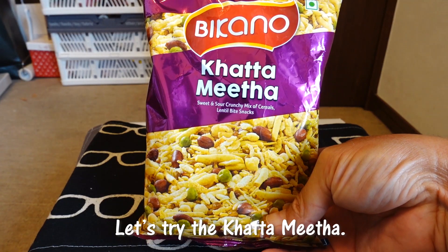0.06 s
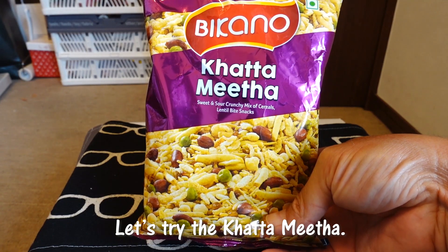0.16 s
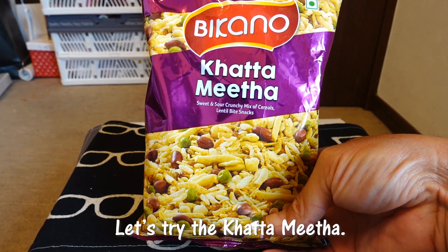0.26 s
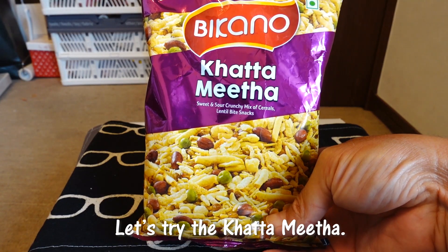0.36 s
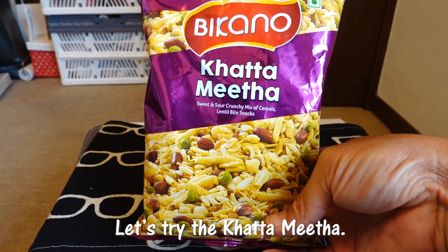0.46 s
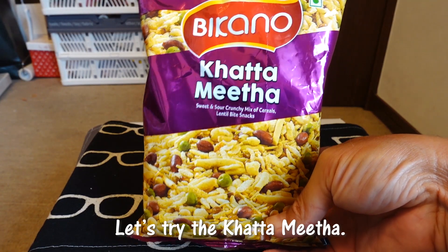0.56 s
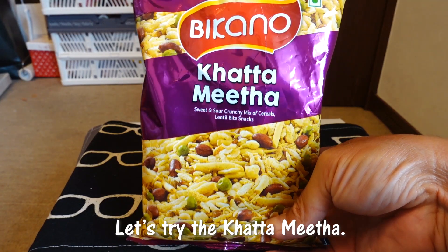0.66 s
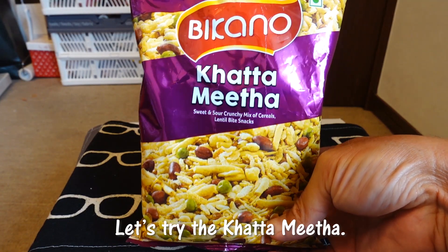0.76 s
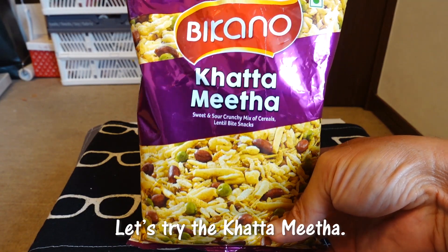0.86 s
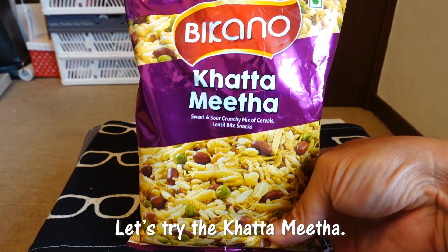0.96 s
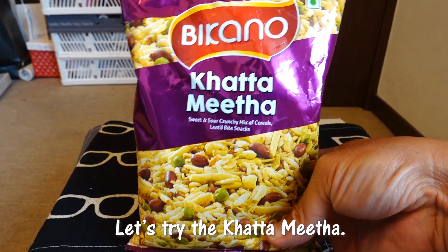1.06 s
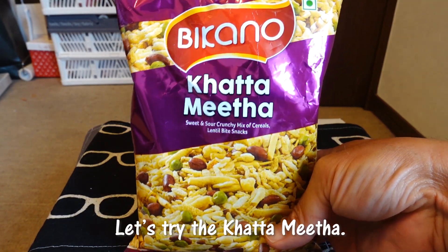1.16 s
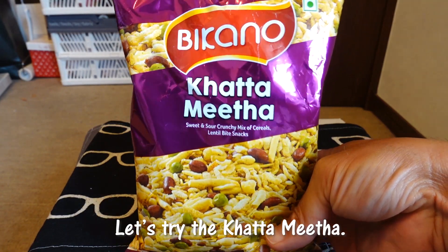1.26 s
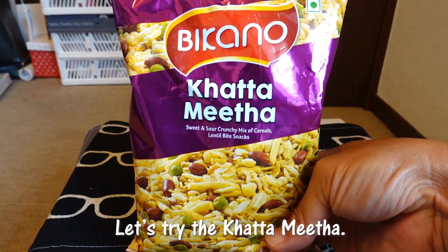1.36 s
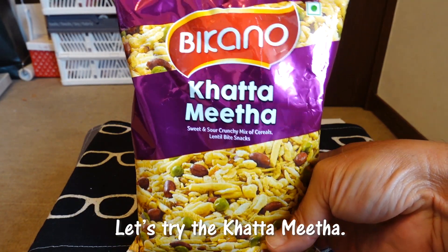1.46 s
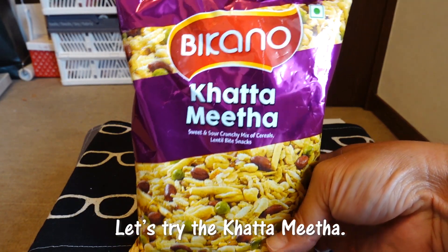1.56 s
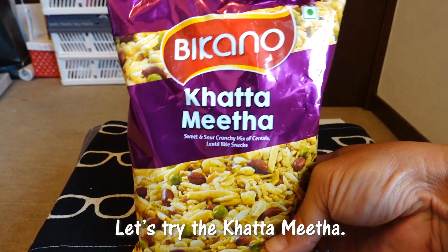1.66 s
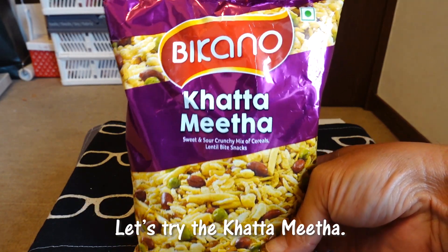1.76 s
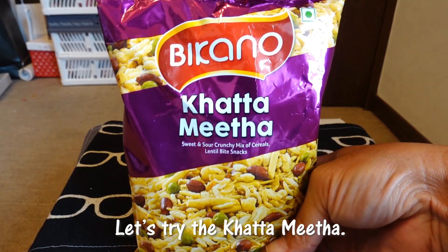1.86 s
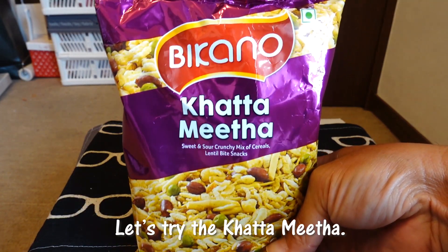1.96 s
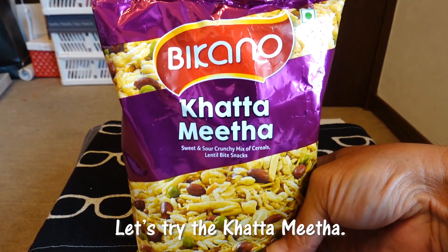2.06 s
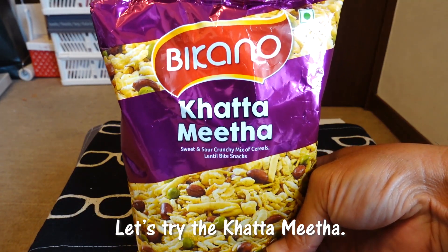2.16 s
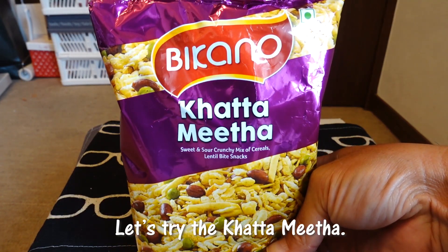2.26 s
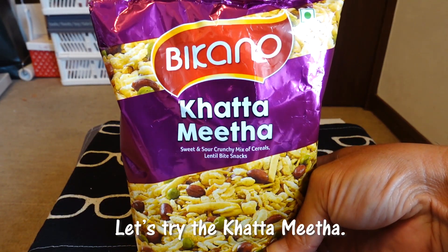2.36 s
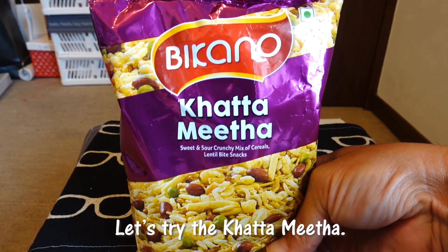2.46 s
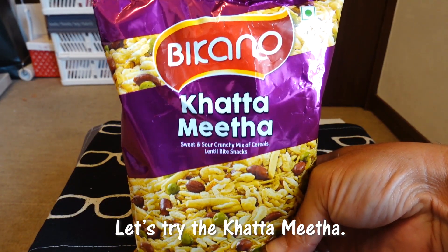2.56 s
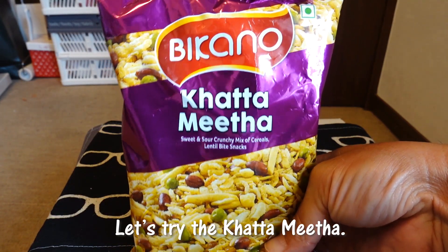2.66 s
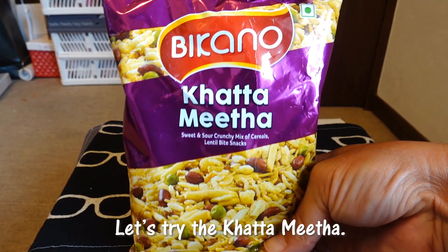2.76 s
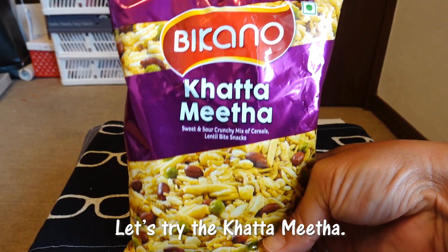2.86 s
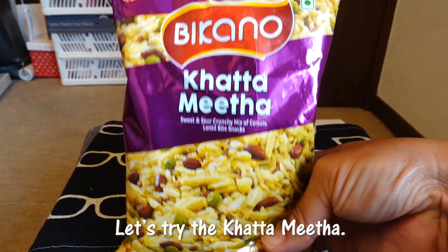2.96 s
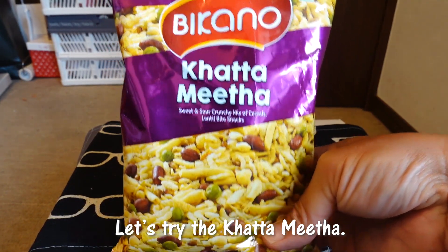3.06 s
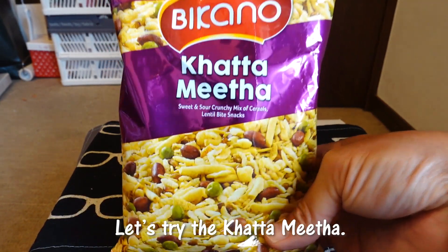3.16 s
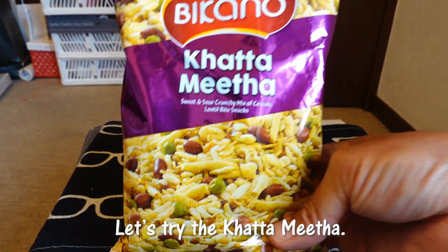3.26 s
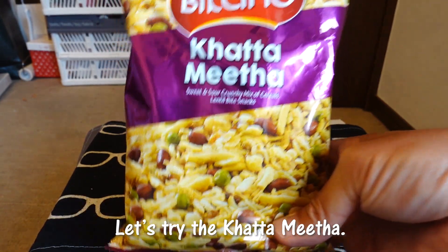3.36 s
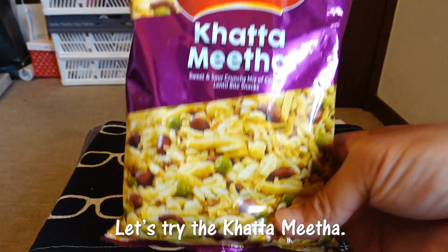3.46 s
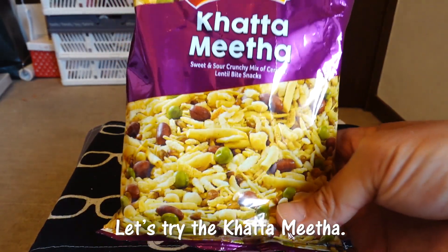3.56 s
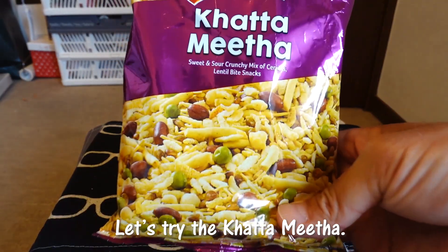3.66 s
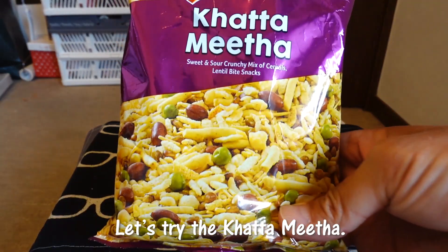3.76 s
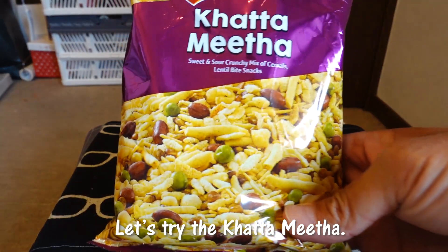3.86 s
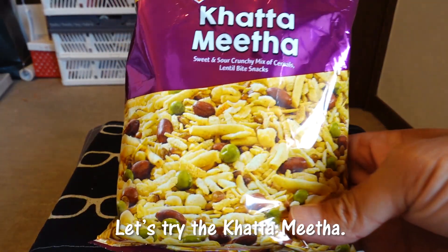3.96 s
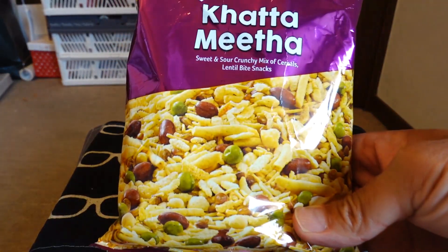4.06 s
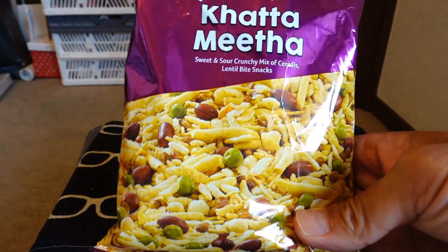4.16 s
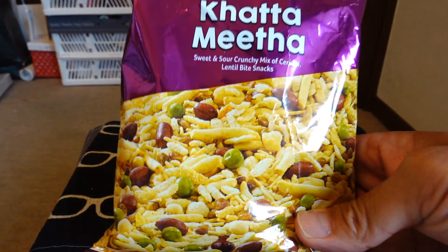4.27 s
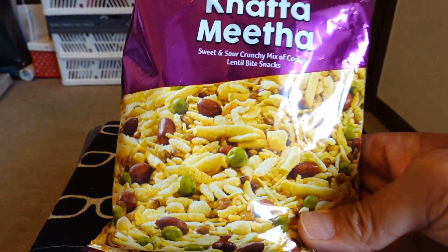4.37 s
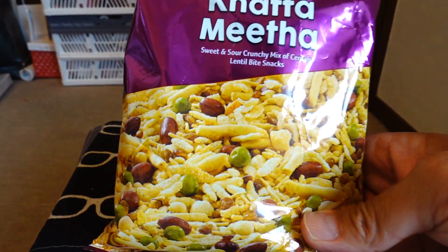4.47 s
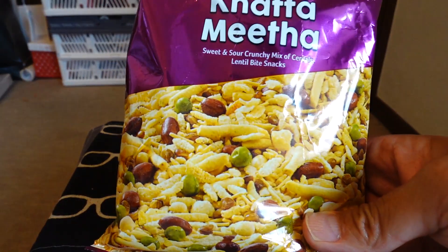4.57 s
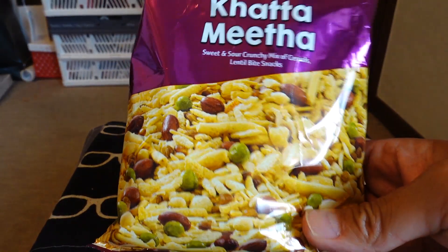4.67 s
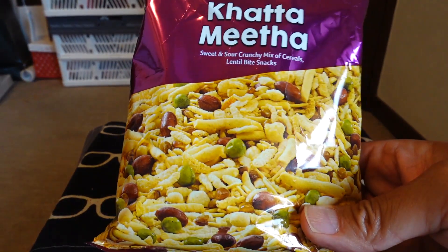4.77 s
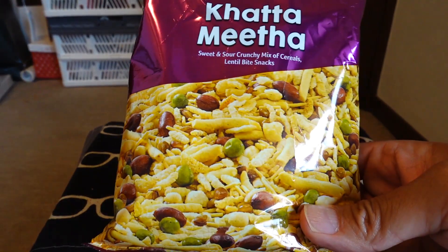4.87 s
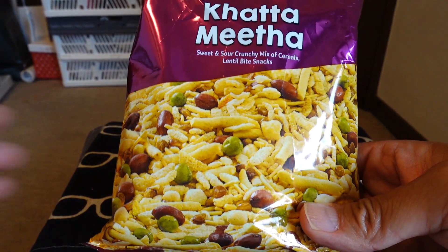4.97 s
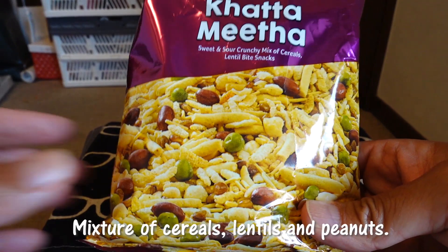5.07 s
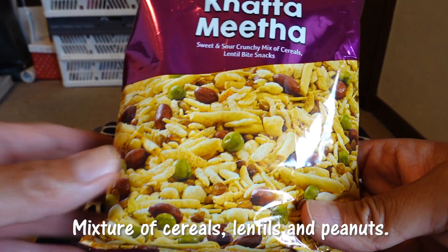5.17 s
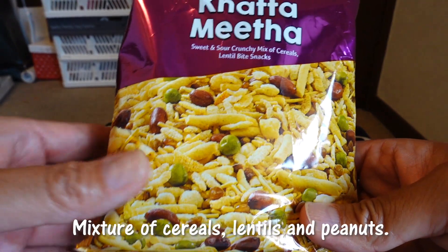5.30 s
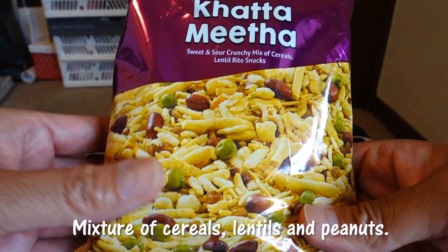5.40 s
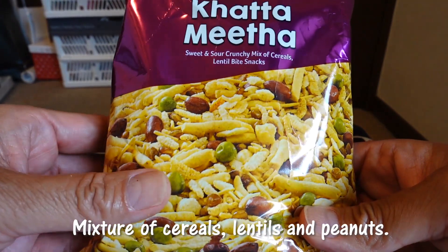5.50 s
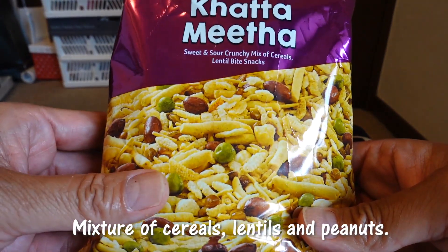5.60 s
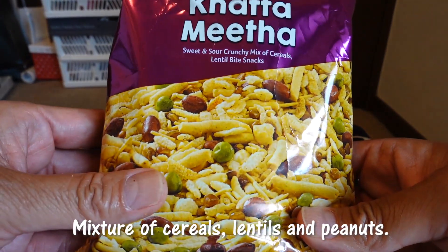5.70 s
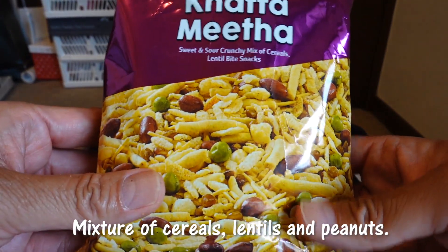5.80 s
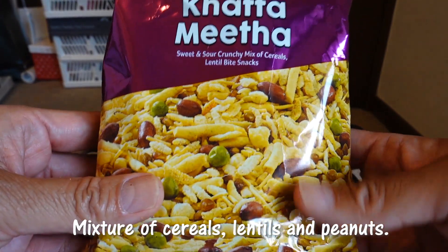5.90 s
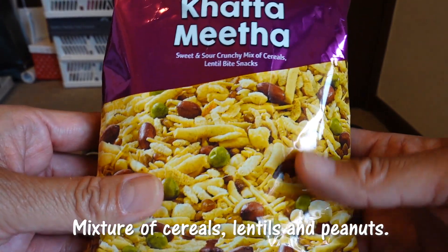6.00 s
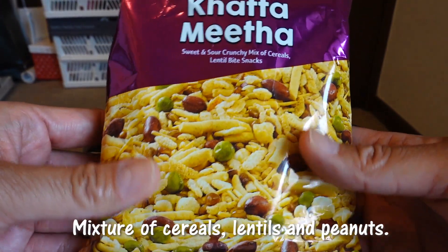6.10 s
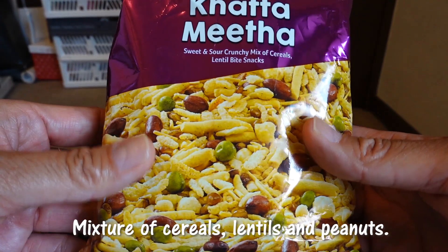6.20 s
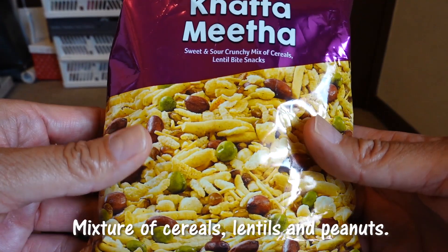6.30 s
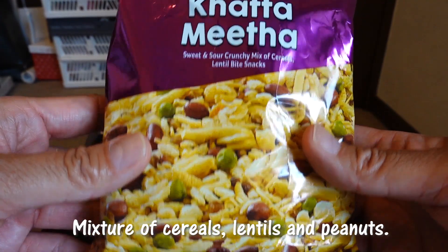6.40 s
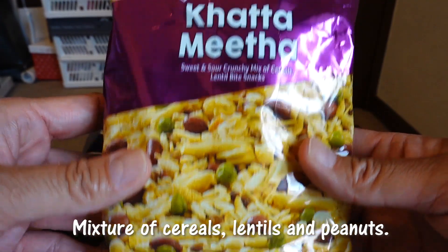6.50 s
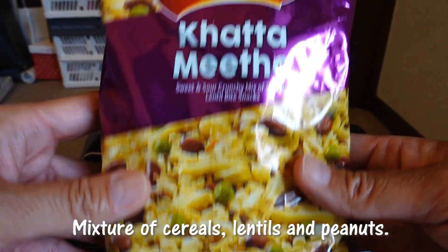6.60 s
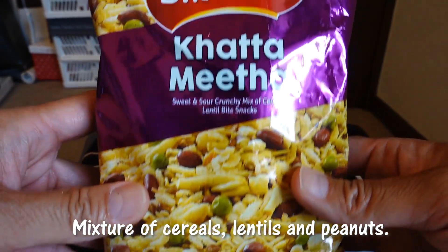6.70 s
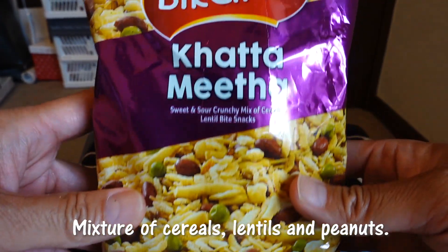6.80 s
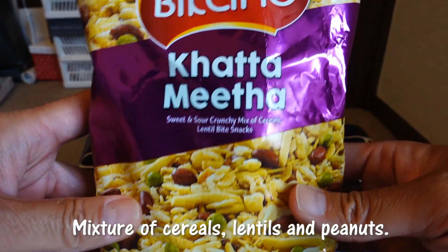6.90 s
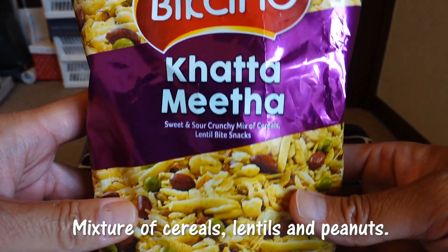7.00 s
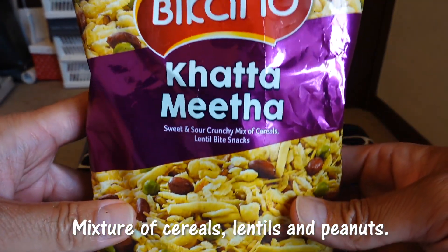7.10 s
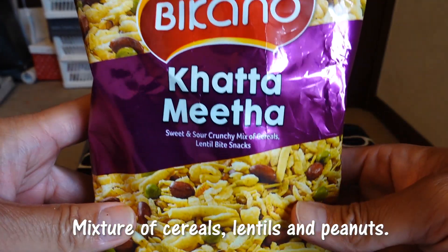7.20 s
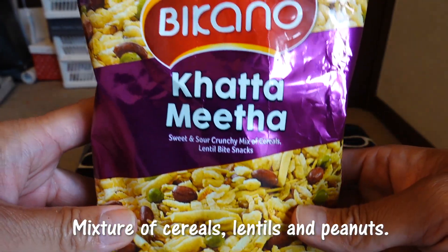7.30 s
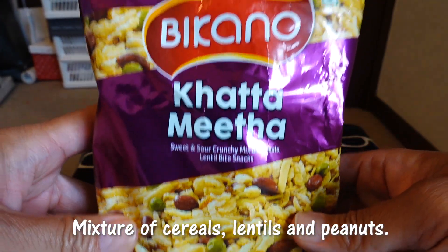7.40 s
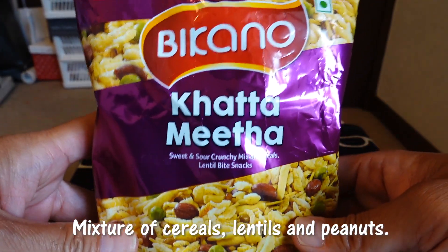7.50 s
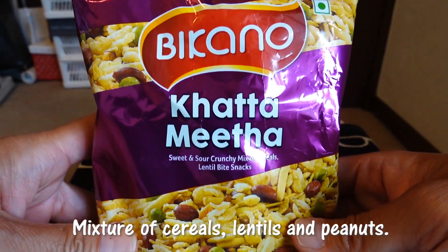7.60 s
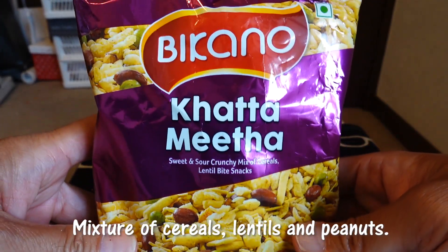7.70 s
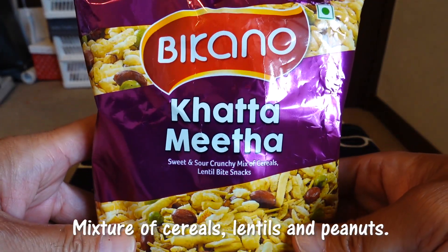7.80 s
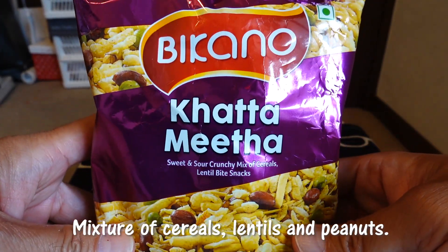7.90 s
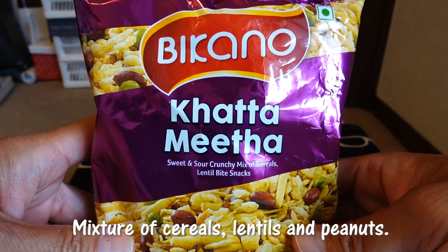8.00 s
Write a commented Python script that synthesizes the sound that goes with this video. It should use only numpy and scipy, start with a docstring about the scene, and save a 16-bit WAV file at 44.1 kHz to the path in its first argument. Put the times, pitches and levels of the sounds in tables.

```python
"""In a small, quiet room two hands hold and turn a foil snack packet close by.
In three spells of handling, creases in the stiff film snap at set times, from faint ticks to loud cracks:
each is a burst of band-filtered noise. Small folds give way at random as further bursts, and tiny
wrinkles make a rustle of random noise ticks. The walls answer with decaying noise; beneath lie soft air
noise, a steady whirr of three noise resonances, and a low hum whose pitch and level waver."""
import sys
import numpy as np
from scipy import signal
from scipy.fft import rfft, irfft, next_fast_len
from scipy.io import wavfile
from scipy.ndimage import map_coordinates

SR = 44100
rng = np.random.default_rng(int(sys.argv[2]) if len(sys.argv) > 2 else 0)


def int16_out(signal):
    """Quantize to a 16-bit WAV file."""
    q = np.round(np.clip(np.atleast_2d(signal).T, -1, 1) * 32767)
    wavfile.write(sys.argv[1], SR, q.astype(np.int16))


N = 355005

# how hard the fingers work the film, one curve for each spell of handling:
# (time [s], effort [dB, before the level of each layer])
HANDLING = [
    [(0.8, -75.5), (1.092, -61), (1.276, -61), (1.388, -50.5), (1.534, -53.5), (1.63, -48), (1.836, -59.5),
     (2.074, -66.5), (2.3, -91)],
    [(2.9, -75), (3.1, -70), (3.31, -54), (3.48, -53.5), (3.66, -65.5), (3.9, -55.5), (4.09, -56.5),
     (4.3, -61.5), (5.15, -64.5)],
    [(5.15, -64.5), (5.35, -53), (5.55, -47.5), (5.88, -50.5), (6.05, -49), (6.29, -46.5), (6.69, -48.5),
     (7.56, -62.5), (8.05, -71)],
]
# left-right correlation of the air and the whirr: (frequency [Hz], correlation [-1 to 1])
AIR_ALIKE = [(60, 1), (130, 0.32), (290, -0.011), (1400, -0.16), (6800, -0.21), (15000, 1)]


def amp(db):
    """Level law: decibels to an amplitude gain."""
    return 10 ** (np.asarray(db) / 20)


def unit(x):
    """Normalisation: scale to rms 1."""
    return x / np.sqrt(np.mean(x ** 2) + 1e-20)


def along(points, hz):
    """Logarithmic frequency scale: read (Hz, value) points between their knots."""
    f, v = np.transpose(points)
    return np.interp(np.log(hz + 1), np.log(f + 1), v)


def curve(rows):
    """Linear interpolation: (s, value) rows to one value per sample."""
    return np.interp(np.arange(N) / SR, *np.transpose(rows))


def wobble(rate):
    """Slow random modulation: a smooth curve through `rate` random knots a second."""
    knots = rng.standard_normal(int(N * rate / SR) + 4)
    return map_coordinates(knots, [np.arange(N) * rate / SR])


def filtered(x, response):
    """Linear filtering: the spectrum of x times a response of frequency, zero-padded."""
    n = x.shape[-1]
    m = next_fast_len(n + n // 2)
    spectrum = rfft(x, m) * response(np.fft.rfftfreq(m, 1 / SR))
    return irfft(spectrum, m)[..., :n]


def stereo_noise(gain, alike, size):
    """Interchannel correlation: the mid-side balance of coloured noise sets how alike the ears are."""
    def mid_side_gain(hz):
        turn = np.arccos(np.clip(along(alike, hz), -1, 1)) / 2
        return gain(hz) * np.array([np.cos(turn), np.sin(turn)])

    mid, side = filtered(rng.standard_normal((2, size)), mid_side_gain)
    return unit(np.array([mid + side, mid - side]))


def add(track, sound, s):
    """Superposition: mix a sound into a track at time s."""
    start = max(0, round(s * SR))
    part = track[:, start:start + sound.shape[-1]]
    part += sound[..., :part.shape[-1]]


def room_air(level_db=-65):
    """Broadband noise: random pressure shaped by a fixed spectrum."""
    # spectrum of the air: (frequency [Hz], relative density [dB per Hz])
    air_spectrum = [(20, -23), (38, -25), (52, -8.5), (130, -0.5), (320, 0.5), (520, -1.5), (850, -1),
                    (1080, -12), (1450, -2), (2200, -4.5), (3500, -11.5), (7000, -17.5), (15500, -23.5)]
    return amp(level_db) * stereo_noise(lambda hz: amp(along(air_spectrum, hz)), AIR_ALIKE, size=N)


def whirr(level_db=-68):
    """Resonance: steady noise selected by three damped modes."""
    # (centre [Hz], half-width at half amplitude [Hz], relative level [dB], left over right [dB])
    modes = [(622, 62, 2.5, -6), (1184, 110, 6.5, 9), (1710, 54, -6.5, -6.5)]
    total = np.zeros((2, N))
    for centre_hz, width_hz, db, lean_db in modes:
        noise = stereo_noise(lambda hz: 1 / (1 + ((hz - centre_hz) / width_hz) ** 2), AIR_ALIKE, size=N)
        total += amp(db) * unit(amp([[lean_db / 2], [-lean_db / 2]]) * noise)
    return amp(level_db) * total


def low_hum(pitch_hz=100.6, waver_hz=4.0, waver_db=2.5, level_db=-1.0):
    """Frequency and amplitude modulation: a sine with random waver of pitch and level."""
    # swells of the hum: (time [s], level [dB, before level_db])
    swells = [(0.0, -75), (0.27, -69.5), (0.65, -89), (1.59, -77), (1.64, -87), (1.99, -69.5), (2.08, -80),
              (2.85, -81), (3.03, -91), (3.27, -64), (3.72, -85), (3.76, -76.5), (5.56, -69.5), (5.69, -88),
              (5.87, -70.5), (6.84, -83.5), (7.73, -75), (8.05, -85)]
    phase = 2 * np.pi * np.cumsum(pitch_hz + waver_hz * wobble(22)) / SR
    tone = unit(amp(waver_db * wobble(11)) * np.sin(phase))
    return amp(curve(swells) + level_db) * tone


def background():
    """Superposition of independent sources: air, whirr and hum."""
    return room_air() + whirr() + low_hum()


def room_tail(arrival_s=0.0205, early_db=-6):
    """Reverberation: weak scatter from things nearby, then the walls' answer, decaying band by band."""
    # reverberation time: (frequency [Hz], time to fall 60 dB [s])
    decay_times = [(150, 0.29), (600, 0.4), (2500, 0.31), (6000, 0.31), (14000, 0.38)]
    # spectrum returned by the room: (frequency [Hz], relative level [dB])
    returned = [(150, 0.5), (600, -2), (3000, 1.5), (7000, 3.5), (14000, -0.5)]
    # left-right correlation of the tail: (frequency [Hz], correlation [-1 to 1])
    tail_alike = [(60, .9), (290, 0.17), (640, 0.8), (3100, 0.74), (15000, 0.57)]
    noise = stereo_noise(lambda hz: amp(along(returned, hz)), tail_alike, size=SR // 3)
    hz, t, z = signal.stft(noise, SR, nperseg=256)
    decay = amp(-60 * t / along(decay_times, hz)[:, None])
    tail = signal.istft(z * decay, SR, nperseg=256)[1]
    t = np.arange(tail.shape[1]) / SR
    scatter = amp(early_db * np.clip((arrival_s - t) / 0.0017, 0, 1))
    onset = np.clip(t / 0.0019, 0, 1)
    tail = tail * scatter * onset
    return tail / np.linalg.norm(tail[0])


def effort_db():
    """Excitation strength: how hard the fingers work, up to 30 dB weaker before the first spell."""
    rows = np.concatenate(HANDLING)
    return curve(rows) - 30 * np.clip(1 - np.arange(N) / SR / rows[0][0], 0, 1)


def rustle(level_db=-4, rate=260, spread_db=3.5, slide_db=-11, grain_s=0.0009, room_db=-4):
    """Shot noise: about `rate` wrinkle ticks a second at random times, over the hiss of sliding fingers."""
    # spectrum of the film: (frequency [Hz], relative density [dB per Hz])
    film_spectrum = [(60, -46), (300, 4), (700, 13), (1500, 12.5), (3200, 7), (6000, 0), (10000, -12),
                     (16000, -24)]
    # a light touch stirs only the film, a firm grip the whole bag:
    # below bag_hz each dB of effort adds a further bag_grows dB, none at firm_grip_db
    bag_hz, bag_grows, firm_grip_db = 1780, 0.22, -48
    sizes = (rng.random(N) < rate / SR) * amp(spread_db * np.minimum(rng.exponential(size=N), 3))
    life = np.exp(-np.arange(SR // 100) / SR / grain_s)
    ticks = unit(signal.fftconvolve(sizes, life)[:N] * rng.standard_normal(N))
    slide = amp(slide_db) * rng.standard_normal(N)
    film = unit(filtered(ticks + slide, lambda hz: amp(along(film_spectrum, hz))))
    effort = effort_db()
    body = filtered(film, lambda hz: 1 / (1 + (hz / bag_hz) ** 4))
    body_growth = amp(bag_grows * (effort - firm_grip_db)) - 1
    film = (film + body * body_growth) * amp(effort + level_db)
    reverberant = signal.fftconvolve(film[None], room_tail(), axes=1)[:, :N]
    return film + amp(room_db) * reverberant


def fold_db(hz, pitch_hz, body_db, crisp_db, ring_db, overtone_db, ring_octaves,
            fade_db=7, top_db=-30, film_db=3, bass_db=-35):
    """Plate resonance: half-octave levels shaped at a fold's pitch, its octave and the film's 5.2 kHz."""
    shape = [(40, body_db - 82), (100, body_db + bass_db), (350, body_db), (pitch_hz, 0),
             (8000, crisp_db), (11300, crisp_db - fade_db), (16000, crisp_db + top_db)]
    bump = lambda centre_hz, octaves: np.exp(-(np.log2((hz + 1) / centre_hz) / octaves) ** 2)
    peaks = ring_db * bump(pitch_hz, ring_octaves) + overtone_db * bump(2 * pitch_hz, ring_octaves)
    return along(shape, hz) + peaks + film_db * bump(5220, 0.27)


def snap(pitch_hz, life_ms, colour, shiver_db=-25, shiver_s=0.033, dispersion=0.46):
    """Buckling and dispersion: a crease flips in half-octave bursts, low ones slower, then the bag shivers."""
    # short waves reach left and right less alike: (frequency [Hz], side-to-mid level [dB])
    width = [(200, -33), (1000, -19), (3000, -17.5), (7000, -14.5), (13000, 6.5)]
    # one band lies on the fold's pitch
    lowest_hz = pitch_hz / 2 ** (np.round(2 * np.log2(pitch_hz / 125)) / 2)
    centres = lowest_hz * 2 ** (np.arange(15) / 2)[:, None, None]
    t = np.arange(1200) / SR
    mid, side = rng.standard_normal((2, len(t)))
    side = side * amp(along(width, centres))
    band = lambda hz: np.exp(-(2 * np.log2((hz + 1) / centres)) ** 2)
    noise = filtered(np.concatenate([mid + side, mid - side], axis=1), band)
    # time in units of each band's rise time; life_ms holds at 2500 Hz
    u = t / (max(life_ms, .15) / 1000 * (centres / 2500) ** -dispersion)
    flip = u * np.exp(1 - u)
    shiver = amp(shiver_db) * (1 - np.exp(-u)) * np.exp(-t / (shiver_s * (centres / 2000) ** -.5))
    # a small panel radiates little far below or above its band
    radiation = lambda hz: (1j * hz / (1j * hz + centres / 4)) ** 3 / (1 + (hz / centres / 1.4) ** 6)
    burst = filtered(noise * (flip + shiver), radiation)
    # each band to rms 1 over 10 ms
    burst /= np.sqrt(np.sum(burst ** 2, axis=(1, 2), keepdims=True) / (2 * .01 * SR))
    return np.sum(burst * colour(centres), axis=0)


def creases(rows, room_db=-1.5, count=16):
    """Direct and reverberant field: each snap adds its own, broader colour through one of `count` tails."""
    ring_octaves, wall_ring_octaves = .2, .36  # width of a fold's ring, nearby and at the walls
    # above hard_snap_db the octave gains overtone_grows dB per dB of snap level
    base_overtone_db, hard_snap_db, overtone_grows = -1.5, -36.5, 0.67
    track = np.zeros((2, N))
    tails = [room_tail() for _ in range(count)]
    # half-octave level over 10 ms to gain per Hz
    per_hz = lambda hz: SR * np.sqrt(.01 / (np.log(2) * (hz + 1)))
    for k, (s, db, pitch_hz, body_db, crisp_db, life_ms, wall_db, ring_db) in enumerate(rows):
        overtone_db = base_overtone_db + overtone_grows * max(db - hard_snap_db, 0)
        colour = lambda hz, octaves: amp(
            fold_db(hz, pitch_hz, body_db, crisp_db, ring_db, overtone_db, octaves))
        near = lambda hz: colour(hz, ring_octaves)
        far = lambda hz: colour(hz, wall_ring_octaves) * per_hz(hz)
        add(track, amp(db) * snap(pitch_hz, life_ms, near), s)
        add(track, amp(db + wall_db + room_db) * filtered(tails[k % count], far), s)
    return track


def small_folds(count=150):
    """Random point process: folds give way as strongly as the fingers press; rows as for timed creases."""
    folds_per_s, over_effort_db, spread_db = 15, -5, 2
    middle_hz, spread_octaves, middle_life_ms = 2480, 0.59, 0.68
    body_db, crisp_db, wall_db, ring_db = -21.5, -13.5, -1, 4.5
    effort = effort_db()
    draws = rng.standard_normal((count, 3)).clip(-2, 2)
    first_s = HANDLING[0][0][0]
    times = np.cumsum(rng.uniform(.2, 1.8, count)) / folds_per_s + first_s
    rows = []
    for s, (size, pitch, life) in zip(times, draws):
        if s * SR < N:
            level_db = effort[int(s * SR)] + over_effort_db + spread_db * size
            pitch_hz = middle_hz * 2 ** (spread_octaves * pitch)
            life_ms = middle_life_ms * 2 ** (life / 2)
            rows.append((s, level_db, pitch_hz, body_db, crisp_db, life_ms, wall_db, ring_db))
    return rows


def timed_creases():
    """Snap-through instability: creases that snap at set times, from faint ticks to loud cracks."""
    # (time [s], level [dB], pitch of the fold [Hz], body at 350 Hz [dB], crispness at 8 kHz [dB],
    #  life at 2500 Hz [ms], share thrown at the walls [dB, before room_db], ring at its pitch [dB])
    snaps = [(1.0789, -47.5, 5300, -22.5, -12.5, 1.3, 2, -1.5), (1.1926, -55.5, 2420, -34, -15, 1.4, 0, -4),
             (1.344, -51.5, 770, -30, -26, 1.1, -19, 4), (1.3806, -51.5, 2260, -34, 9, 0.34, -2.5, 19),
             (1.4123, -62.5, 766, -21, 6, 0.87, -13, 16), (1.49, -61, 2730, -30, -29, 1, 7, 9),
             (1.527, -50.5, 2180, -12, -13, 2.2, -4, 9.5), (1.5442, -56, 1220, 1, -11, 2.8, -1, 10.5),
             (1.6458, -61, 1360, -37, -3, 0.8, -1, 18), (1.711, -54, 1570, -2, -20, 2.2, 4.5, 9.5),
             (1.772, -49.5, 1760, -15, -10, 2.8, -5.5, 1), (2.3814, -38.5, 2400, -20, -24, 1.4, -10, -17),
             (2.3888, -39, 3460, -5.5, -6, 2.3, -3.5, 5), (3.029, -70.5, 3000, -17, -5.5, 1.2, 11.5, -4),
             (3.3426, -53.5, 1120, -56, 1, 0.83, -6, 5.5), (3.4555, -54.5, 1860, -21, -10, 1.3, 9.5, 2),
             (3.4848, -44.5, 1560, -28, -16, 0.33, -11, -7), (3.4959, -38, 1260, -29, -4, 0.84, -8, -5.5),
             (3.5599, -48.5, 1700, -14.5, -20, 0.99, -7, -7), (3.5995, -47, 1770, -32, -20, 0.55, 5.5, -5),
             (3.9312, -46.5, 1130, -24, -12.5, 3, 3, -0.5),
             (3.9793, -40.5, 3200, -27.5, -10, 0.49, -9, 1.5), (4.0904, -56, 2800, -40, 11, 0.42, -15, 13),
             (4.0944, -51.5, 2900, -39, 2.5, 0.43, -7, 14), (4.1026, -58.5, 3700, -15, -3, 0.36, -10, 16.5),
             (4.2073, -62, 3080, -31, -8, 0.65, -2, 9.5), (4.2598, -59, 1690, -41, -4.5, .47, 3, 5.5),
             (4.2711, -59.5, 3000, -24, -4.5, .9, -0.5, 7.5), (4.2908, -58.5, 3130, -29, -20, 0.27, -9, 6),
             (4.4377, -61.5, 3230, -26, 2, .3, -0.5, 9), (4.4548, -71, 3110, -25, 1, .4, -11, -3),
             (4.641, -56, 824, -16, -15, 2.6, 7, 3.5), (4.7287, -43, 2620, -26.5, -4, 0.49, 1.5, 11.5),
             (4.7919, -42, 1090, -41, -39, 0.68, -6, 2.5), (5.0036, -61.5, 2930, -5.5, -45, 0.66, -4, 7.5),
             (5.437, -36.5, 3630, -19, -14, 0.77, 0, 1), (5.5371, -40.5, 2460, -23, -5, 0.46, -8, 3.5),
             (5.5993, -42.5, 3470, -27, -5, 0.48, -2, -3), (5.6459, -44, 1600, -16, -36, 0.5, 3, -2),
             (5.758, -56.5, 1640, -3.5, -43, 1.4, -1, 15.5), (5.8428, -41.5, 2510, -23, -40, 1.1, 6, -8),
             (5.8528, -54.5, 3700, 3, 4, 0.15, -15, 9), (5.8759, -32, 3600, -17, -8.5, 0.86, -4, 2.5),
             (5.8803, -33, 1680, -27, -14, 0.42, -11, -11), (5.8881, -34.5, 870, -17, -11, .48, -22, -3),
             (5.9042, -31, 2360, -32, -26, 1.5, 0, -8), (5.951, -34, 660, -47, -2.5, 1.9, -6.5, 5),
             (6.03, -41.5, 3480, -18, -1.5, 0.43, -9, 3), (6.0875, -36.5, 910, -37, 1.5, 0.38, -5, 12),
             (6.1115, -31.5, 840, -28, -11.5, 1.3, -4, -6), (6.1832, -34.5, 1270, -13, -33, 0.98, -6, -1),
             (6.1875, -36, 1120, -6.5, -10, 1.7, -3.5, 0), (6.2621, -44.5, 1680, -17, -17, 0.48, 4.5, -3),
             (6.3056, -40, 1590, -13.5, -55, 1.9, -12, -6), (6.368, -48, 850, -5.5, -49, 1.4, 1, 5.5),
             (6.399, -47, 1680, -23, -22, .24, -16, 3.5), (6.4302, -40, 1170, -18.5, -12, 0.81, -8, 2),
             (6.452, -44.5, 670, -15, -13, 1.3, 5, 1), (6.5593, -33, 2900, -22.5, -6.5, 0.95, 3, 7.5),
             (6.5786, -32.5, 3350, -12.5, -9.5, 1.3, -5, 0),
             (6.6971, -31, 3020, -41, -41, 0.37, -2.5, -7.5), (6.8888, -41, 1190, -22, -11, 0.86, -6, 1),
             (6.9019, -41.5, 1190, -31, -24, 0.32, -3, 2), (6.9677, -29, 1790, -26, -15, 1.23, -7, 0.5),
             (7.0462, -27.5, 1740, -41, -15.5, 0.64, -10, 1),
             (7.3397, -35, 1930, -26.5, -7.5, 0.54, -4.5, 2), (7.6605, -62.5, 1270, 2, -50, 1.3, 1, 5),
             (7.762, -48.5, 1420, -12, -35.5, 2.2, -2, -4.5), (7.8278, -63.5, 1110, -28, -28, 1, 5, 10.5),
             (7.9149, -59.5, 3400, -13.5, -30, .7, -6, 2), (7.966, -52.5, 1520, -49, -1.5, 0.8, -3, 13.5)]
    return snaps


def scene():
    """Superposition and panning: the packet sits a little right of centre over the background."""
    lean = amp([[-.5], [.5]])
    packet = rustle() + creases(timed_creases() + small_folds())
    return background() + packet * lean


def record(dry, top_hz=16100):
    """Band limitation: an ideal low-pass leaves nothing at or above top_hz."""
    return filtered(dry, lambda hz: hz < top_hz)


dry = scene()
out = record(dry)
int16_out(out)
```